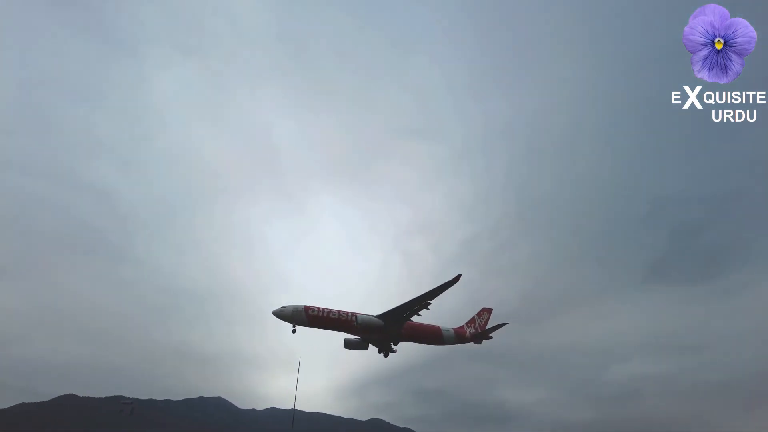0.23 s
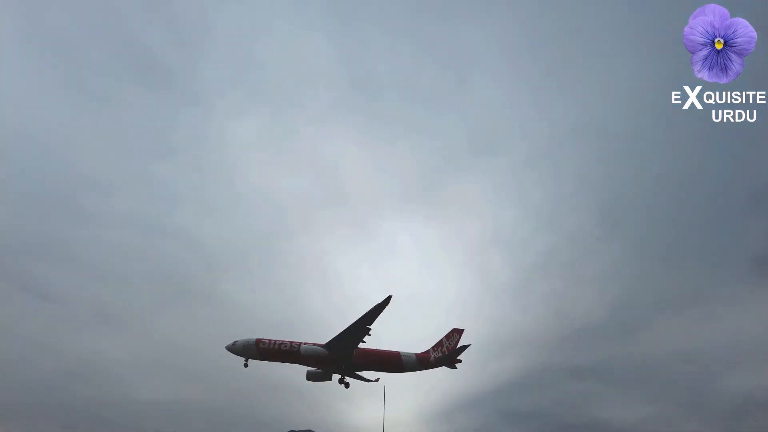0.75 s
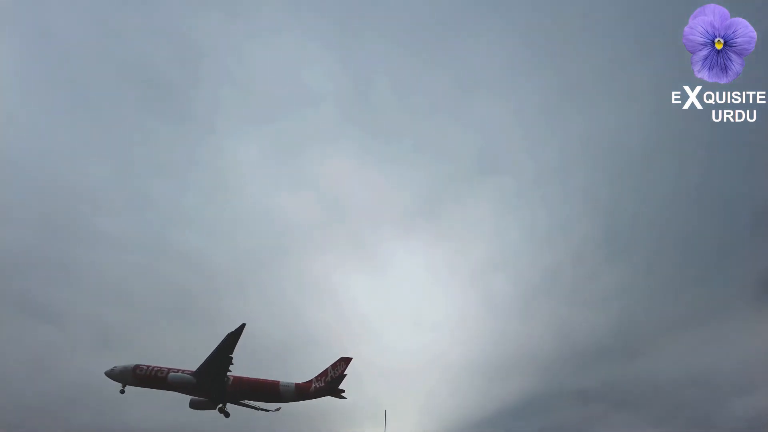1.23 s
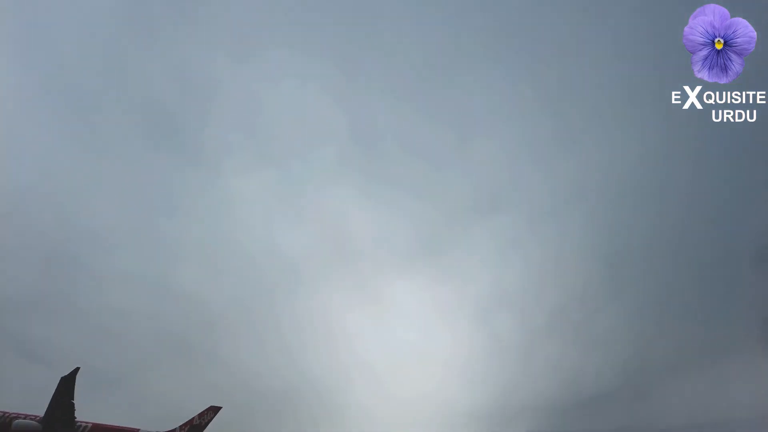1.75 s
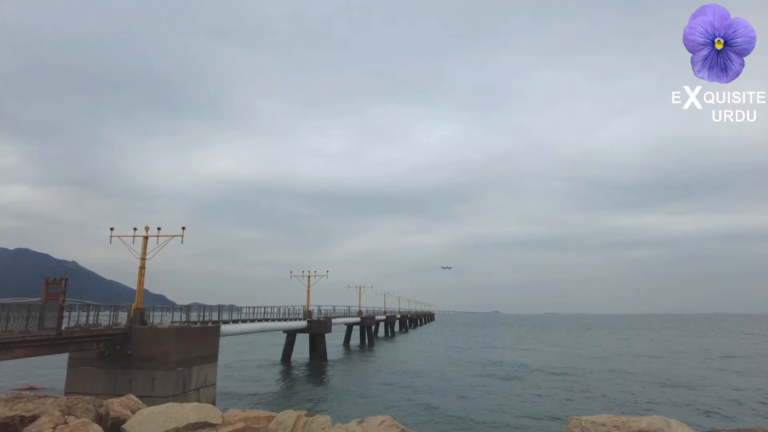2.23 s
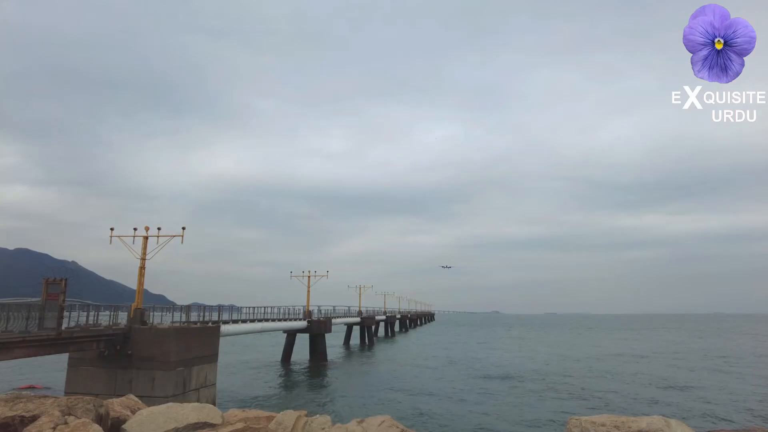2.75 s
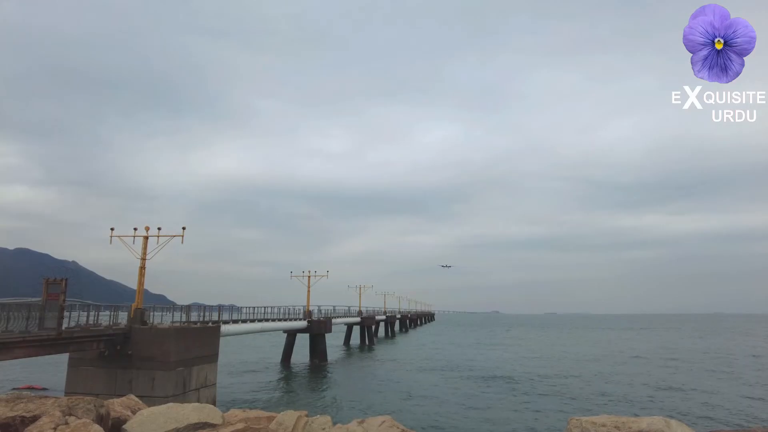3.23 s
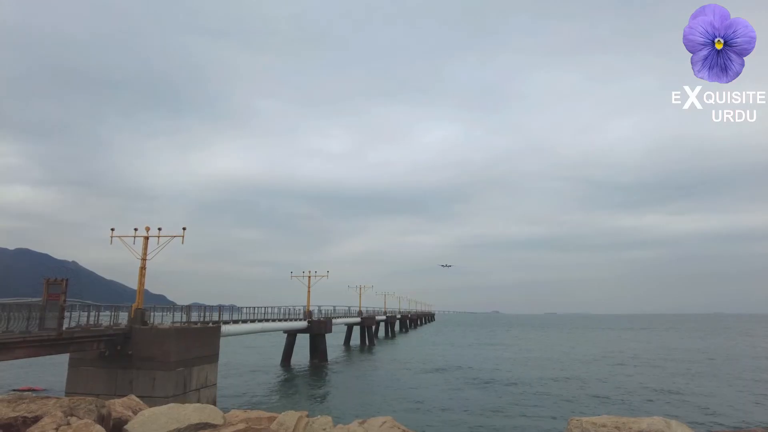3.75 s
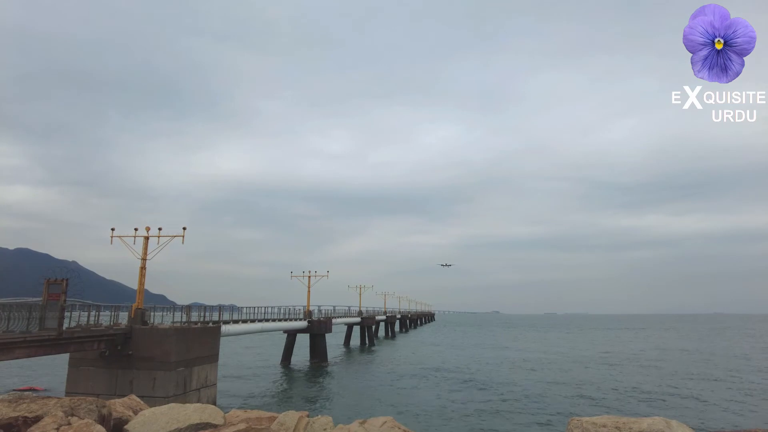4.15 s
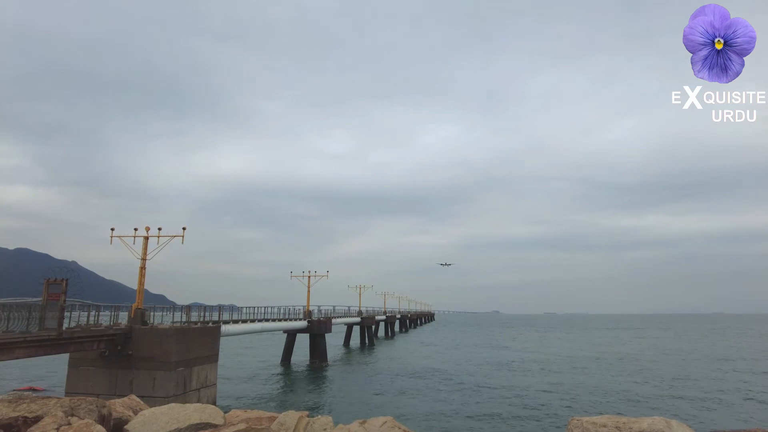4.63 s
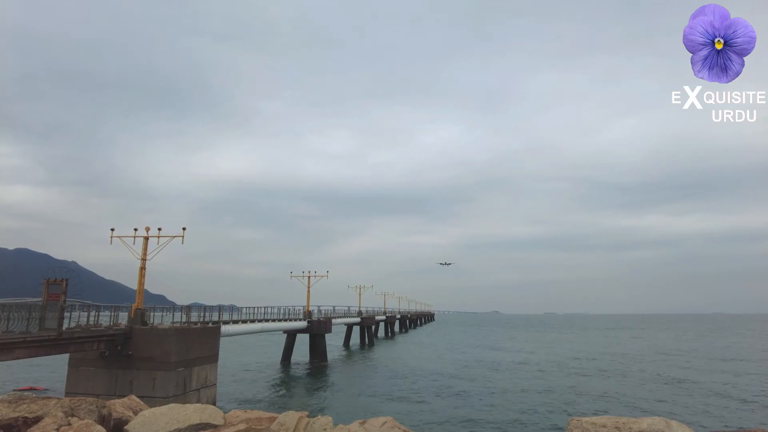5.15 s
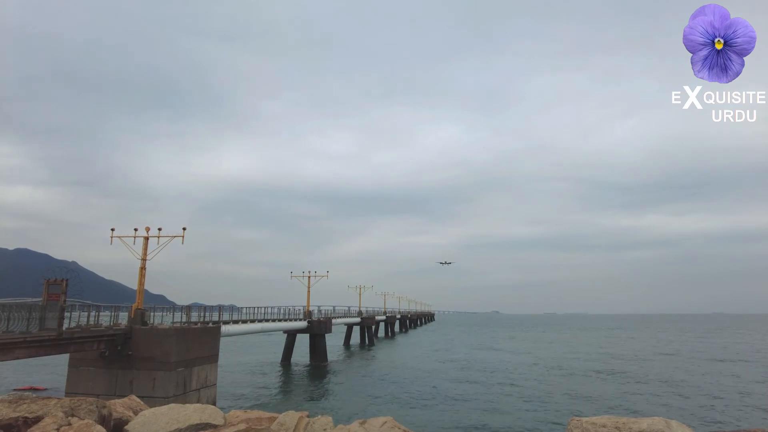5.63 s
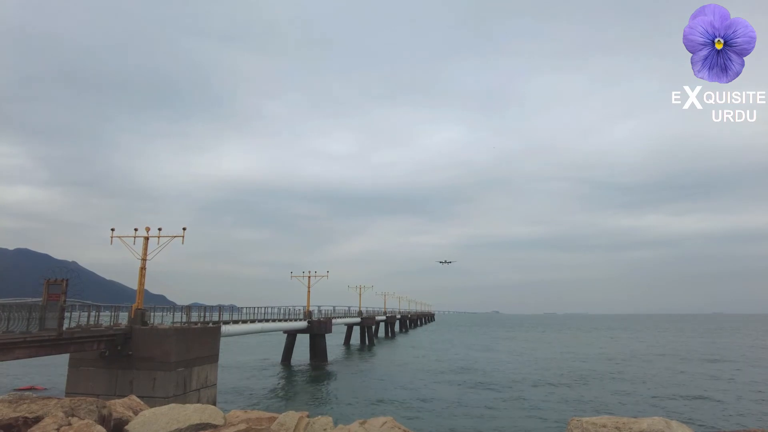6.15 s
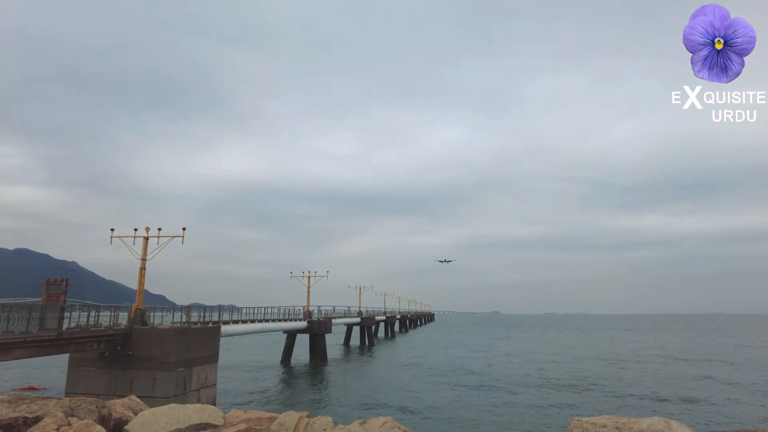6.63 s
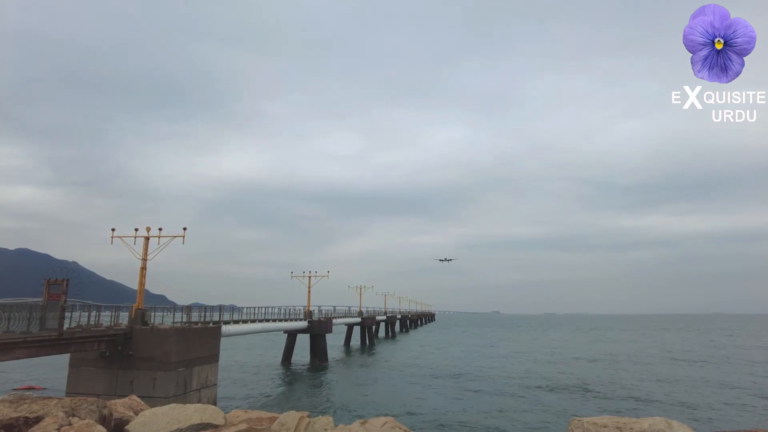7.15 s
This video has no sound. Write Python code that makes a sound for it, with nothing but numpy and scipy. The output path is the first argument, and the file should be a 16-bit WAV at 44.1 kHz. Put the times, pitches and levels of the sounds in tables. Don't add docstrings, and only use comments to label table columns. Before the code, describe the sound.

A twin-engine jet roars past low overhead, then an abrupt cut to a windy shore with distant engine rumble and faint whine.

```python
import sys
import numpy as np
from scipy import signal
from scipy.io import wavfile
from scipy.ndimage import uniform_filter1d

SR = 44100
rng = np.random.default_rng(int(sys.argv[2]) if len(sys.argv) > 2 else 0)


def rack_gain(trim_db):
    fader = np.asarray(trim_db, float)
    return 10 ** (fader / 20)


def materialize(psi):
    bounded = np.clip(np.atleast_2d(psi).T, -1, 1)
    quanta = np.round(bounded * 32767).astype(np.int16)
    wavfile.write(sys.argv[1], SR, quanta)


N = 325899
CUT = 94330


def in_time(rows):
    s, *columns = np.transpose(rows)
    return [np.interp(np.arange(N) / SR, s, c) for c in columns]


def at_hz(points, hz):
    point_hz, point_db = np.array(points).T
    return np.interp(np.log(hz), np.log(point_hz), point_db)


def rms_one(x):
    return x / np.sqrt(np.mean(x ** 2) + 1e-20)


def steep(x, hz):
    return signal.sosfilt(signal.cheby2(8, 50, hz, fs=SR, output="sos"), x)


def late(x, samples):
    return np.interp(np.arange(len(x)) - samples, np.arange(len(x)), x)


def drift(rate, size=N):
    r = np.exp(-80 * np.pi * rate / SR)
    white = rng.standard_normal(size // 40 + 2002)
    slow = signal.lfilter([1], [1, -2 * r, r * r], white)[2000:]
    return np.interp(np.arange(size) / 40, np.arange(len(slow)), rms_one(slow))


def hum(width_hz, hz):
    phase = 2 * np.pi * np.cumsum(hz) / SR
    in_phase = drift(width_hz, len(hz)) * np.cos(phase)
    return in_phase + drift(width_hz, len(hz)) * np.sin(phase)


def bands(spectrum, edges_hz, patchy_db, speed, size=N):
    together = drift(speed, size)
    white = rng.standard_normal((2, 2, size + 4000))
    for k, (low, high) in enumerate(zip(edges_hz, edges_hz[1:])):
        band = signal.butter(2, [low, high], "band", fs=SR, output="sos")
        pair = signal.sosfilt(band, white[k % 2])[:, 4000:]
        hz = np.sqrt(low * high)
        flicker_db = patchy_db * (0.26 * together + drift(speed, size))
        mid, side = pair * rack_gain(at_hz(spectrum, hz) + flicker_db)
        yield hz, mid, side


def wide(spectrum, low_hz, high_hz, count, patchy_db, speed, width_db=0):
    # (frequency [Hz], side over mid [dB])
    shore_side = [(60, -48.5), (330, -39.5), (1000, -27.5), (1900, -26.5), (3200, -7.5), (5000, -5.5),
                  (9000, 0.5)]
    total = 0
    for hz, mid, side in bands(spectrum, np.geomspace(low_hz, high_hz, count), patchy_db, speed):
        total = total + np.array([mid, rack_gain(at_hz(shore_side, hz)) * side])
    mid, side = total
    return rms_one(mid + rack_gain(width_db) * side * [[1], [-1]])


def spells(rows, rise, fall):
    t = np.arange(0, N, 64) / SR
    start, hold, db = np.array(rows)[:, :3].T[..., None]
    before = np.maximum((start - t) / rise, 0)
    after = np.maximum((t - start - hold) / fall, 0)
    return np.repeat(rack_gain(db) ** 2 * np.exp(-before ** 2 - after ** 2), 64, axis=1)[:, :N]


def gusts_db():
    # (start [s], hold [s], buffet [dB], deep thump over buffet [dB])
    gusts = [(0.095, 0.034, -27, -5.5), (0.697, 0.15, -32.5, -3), (1.145, 0.33, -35, 3),
             (1.477, 0.13, -38, 9), (1.738, 0.091, -31.5, 7.5), (2.159, .14, -26.5, -1.5),
             (2.512, 0.087, -31, 0.5), (2.701, 0.14, -27.5, -13), (2.958, 0.024, -25.5, -4.5),
             (3.196, 0.09, -26.5, -11), (3.404, 0.065, -22.5, -2), (3.547, .08, -31, -0.5),
             (3.768, .2, -29, 1), (4.098, 0.12, -25.5, -1), (4.455, .1, -26.5, -1.5), (4.628, .14, -30, -6),
             (4.876, 0.14, -37, 3), (5.203, 0.076, -36.5, -6), (5.927, 0.027, -31.5, -26),
             (6.251, .12, -31, -12), (6.541, .06, -31, -11), (6.673, 0.086, -26.5, -3),
             (6.849, 0.085, -27, -7), (7.176, 0.078, -25, -14)]
    # (time [s], buffet [dB], deep thump over buffet [dB])
    breeze = [
        (0, -30, -5),
        (2.1, -36, 8),
        (2.4, -38, 1.5),
        (5.3, -32.5, -7.5),
        (5.55, -33, -14),
        (6.1, -32, -26),
        (6.3, -33, -7.5),
        (7.39, -27.5, 0),
    ]
    power = spells(gusts, rise=0.022, fall=0.028)
    breeze_db, deep_db = in_time(breeze)
    buffet = power.sum(axis=0) + rack_gain(breeze_db) ** 2
    deep = rack_gain(np.array(gusts)[:, 3]) ** 2 @ power + rack_gain(breeze_db + deep_db) ** 2
    return 10 * np.log10(uniform_filter1d([buffet, deep], size=128))


def shore():
    # (time [s], level [dB])
    swell = [
        (2.2, -42),
        (3.0, -41),
        (3.45, -39.5),
        (3.7, -42),
        (4.35, -38),
        (4.9, -35),
        (5.5, -39.5),
        (6.0, -43.5),
        (6.65, -43.5),
        (7.39, -39),
    ]
    # (frequency [Hz], density [dB per Hz])
    far = [(220, -32), (380, 6.5), (526, 1.5), (812, -3.5), (1620, -7.5), (2180, -21.5), (2400, -39.5),
           (3150, -10), (3300, -16.5), (4290, -56), (7260, -120)]
    # (frequency [Hz], density [dB per Hz])
    spray_tone = [(3500, 7.5), (4500, -4.5), (6000, -6), (8000, -19.5), (10000, -12.5)]
    # (time [s], level [dB])
    spray_level = [
        (2.2, -70.5),
        (3.3, -74.5),
        (4.0, -72),
        (5.0, -70),
        (5.7, -69),
        (6.25, -64.5),
        (6.6, -68.5),
        (7.39, -65.5),
    ]
    roar_db, = in_time(swell)
    buffet_db = gusts_db()[0]
    gust_db = buffet_db + 30
    rumble_db = -35 + 1.01 * np.maximum(buffet_db + 30.5, 0)
    upper_db = -62 + 0.51 * (roar_db + 39) + 1.54 * (np.arange(N) - CUT) / SR + 0.16 * gust_db
    gusty_db = 1.3 * (uniform_filter1d(gust_db, size=3000) + 1.2)
    rumble_tone = [(95, 1), (200, -4.5), (400, -20.5)]
    rumble = rack_gain(rumble_db - 2) * wide(rumble_tone, 85.9, 429, count=5, patchy_db=2.0, speed=17.0)
    roar = wide(far, 455.0, 2180, count=7, patchy_db=0.93, speed=3.8, width_db=gusty_db)
    roar = rack_gain(roar_db + 2.0) * roar
    upper = rack_gain(upper_db + 1.0) * wide(far, 2220, 3580, count=4, patchy_db=2.0, speed=6.1)
    spray = wide(spray_tone, 3530, 10000, count=5, patchy_db=2.3, speed=29.0)
    return steep(rumble + roar + upper, 4010) + rack_gain(in_time(spray_level)[0]) * spray


def far_fans():
    # (start [s], hold [s], level [dB])
    whine = [(2.15, 0.045, -54), (2.38, 0.51, -52.5), (3.11, .38, -53), (3.52, .1, -54.5),
             (3.89, .22, -52.5), (4.15, 0.33, -55), (4.6, 0.57, -42), (5.38, 0.13, -51), (5.53, 0.14, -46),
             (5.96, 0.11, -53.5), (6.35, 0.078, -57), (6.52, 0.49, -52), (6.92, 0.16, -46.5),
             (7.17, .2, -61)]
    # (time [s], level [dB])
    whistle = [
        (2.15, -63),
        (2.5, -67.5),
        (4.0, -65),
        (4.38, -54),
        (5.7, -59),
        (6.25, -62.5),
        (6.5, -58),
        (7.39, -56.5),
    ]
    power = spells(whine, rise=0.01, fall=0.054).sum(axis=0)
    db = 10 * np.log10(uniform_filter1d(power, size=128) + rack_gain(-70.5) ** 2)
    level = 0.96 * rack_gain(db + 1.0 * drift(38.0))
    tone = level * np.sin(2 * np.pi * np.cumsum(2124 + 2.8 * drift(11.0)) / SR)
    neighbour = rack_gain(-64 + 0.65 * (db + 52)) * hum(8.8, np.full(N, 2260))
    flutter = rack_gain(in_time(whistle)[0]) * hum(20.5, 3408 + 8 * drift(3.0))
    return tone + neighbour + flutter


def drops():
    # (time [s], level [dB], lowest [Hz], highest [Hz], rise [s])
    ticks = [
        (2.311, -50, 4000, 4800, .003),
        (2.381, -50, 1500, 4800, .0007),
        (3.404, -42, 1000, 2900, .0008),
        (3.457, -27, 300, 1800, .0008),
        (3.492, -56, 4000, 4800, .006),
        (4.645, -61, 3900, 4900, .008),
        (6.17, -56, 2000, 6000, .0007),
        (6.5, -55, 2000, 5500, .0007),
    ]
    out, t = np.zeros(N), np.arange(-2000, 2000) / SR
    for s, db, low, high, rise in ticks:
        band = signal.butter(4, [low, high], "band", fs=SR, output="sos")
        puff = signal.sosfilt(band, rng.standard_normal(4000))
        shape = np.exp(np.where(t < 0, -(t / rise) ** 2, -t / (1.6 * rise)))
        middle = round(s * SR)
        out[middle - 2000:middle + 2000] += rack_gain(db) * shape * rms_one(puff)
    return out


def evened(x):
    power = uniform_filter1d(np.mean(x ** 2, axis=0), size=int(0.076 * SR)) + 1e-9
    share = 0.6
    return rms_one(x * power ** (-share / 2))


def wind():
    # (frequency [Hz], density [dB per Hz])
    gust_tone = [(60, 3.5), (105, -3), (200, -11), (400, -20.5), (900, -38)]
    buffet_db, thump_db = gusts_db()
    thump = wide([(14, -15), (38, 4), (60, -2)], 14, 60, count=4, patchy_db=3.0, speed=15.0)
    buffet = steep(wide(gust_tone, 59.6, 920, count=7, patchy_db=1.94, speed=14.0), 3400)
    buffet = signal.sosfilt(signal.butter(3, 48, "high", fs=SR, output="sos"), buffet)
    jolts = rack_gain(1.74 * drift(22.0))
    return jolts * (rack_gain(thump_db) * evened(thump) + rack_gain(buffet_db) * evened(buffet))


def howls():
    # (time [s], pitch [Hz], glide [Hz per s], level [dB], half length [s])
    swells = [ (.3, 945, -130, -28.5, .12), (.22, 1180, -40, -34, .06), (.98, 1068, -60, -30.5, .13),
              (1.46, 430, 40, -26, .12), (1.38, 330, 300, -27, .08), (1.7, 995, -40, -34, .09),
              (.78, 280, -80, -25, .07), (1.0, 215, 0, -27, .15), (1.33, 250, 100, -26, .08),
              (1.62, 2700, 300, -36, .16), (1.95, 3100, 500, -36, .12), (1.35, 2600, 200, -38, .07),
              (1.0, 2950, 0, -39, .07), (1.2, 5800, 600, -45, .1), (.55, 5950, 0, -49, .1),
              (.98, 7700, 0, -49, .08), (1.8, 4300, 700, -39, .2), (.15, 730, -50, -34, .1),
              (1.5, 1480, 80, -38, .1)]
    t, out = np.arange(CUT) / SR, 0
    for s, hz, glide, db, half in swells:
        pitch = hz + glide * (t - s)
        core = 1.3 * (hz < 2000) * np.sin(2 * np.pi * np.cumsum(pitch) / SR)
        swell = rack_gain(db) * np.exp(-((t - s) / half) ** 2)
        out = out + swell * (core + 0.6 * hum(6 + 0.02 * hz, pitch))
    return out


def airliner():
    # (time [s], deep roar [dB], nearness [0-1])
    flyby = [
        (0, -24, 0.14),
        (.3, -20, .25),
        (.66, -21, 0.3),
        (.8, -20, 0.35),
        (.98, -19, 0.71),
        (1.2, -21.5, 0.57),
        (1.45, -18, 0.91),
        (1.9, -22.5, 0.82),
        (2.14, -20, 0.56),
    ]
    # (time [s], fan haystack [Hz], haystack [dB], right lag [samples])
    path = [
        (0, 4480, -52, 0.5),
        (.55, 4120, -52, 0.6),
        (.85, 4540, -54, 0.4),
        (1.0, 4200, -47.5, 0.46),
        (1.3, 4550, -45, 0.6),
        (1.6, 4795, -43, 2.1),
        (1.8, 5100, -44, 1.5),
        (2.14, 5300, -57, 2.5),
    ]
    # (frequency [Hz], density [dB per Hz])
    jet = [(53, -45), (90, -28), (161, -3), (428, -6.5), (577, -6), (951, -12), (2290, -24.5), (2910, -28),
           (3630, -30), (4610, -30), (7910, -38), (10700, -53.5), (13900, -81), (22000, -120)]
    # (frequency [Hz], side over mid [dB])
    jet_side = [(60, -32), (110, -23), (190, -29), (330, -21.5), (590, -19.5), (1040, -12), (1840, -43),
                (3270, -4.5), (5780, -6.5), (10200, -16.5)]
    # (frequency [Hz], balance [dB])
    jet_balance = [(200, 0), (450, .5), (1000, 0), (1800, -1.5), (3300, -1.5), (5800, -1), (10000, 1)]
    # (time [s], extra path [ms])
    ground_echo = [
        (0, 3.8),
        (1.0, 4.2),
        (2.14, 4.32),
    ]
    deep_db, near = (c[:CUT] for c in in_time(flyby))
    stack_hz, stack_db, lag = (c[:CUT] for c in in_time(path))
    roar_db = -23.5 - 1.5 * near
    hiss_db = -41 + 8 * near
    top_db = -72.5 + 26.5 * near
    width_db = 0.9 + 7 * np.arange(CUT) / SR

    parts = np.zeros((4, 2, CUT))
    edges_hz = np.geomspace(95, 13500, 20)
    for hz, mid, side in bands(jet, edges_hz, patchy_db=1.21, speed=17.0, size=CUT):
        lean = np.tanh(at_hz(jet_balance, hz) / 13.0) * mid
        part = int(hz > 580) + int(hz > 1900) + int(hz > 8200)
        parts[part] += [mid, lean + side * rack_gain(at_hz(jet_side, hz) - 8.5 + width_db)]
    deep, roar, hiss, top = (part / np.std(part[0]) for part in parts)
    roar = rack_gain(deep_db) * deep + rack_gain(roar_db) * roar
    hiss = rack_gain(hiss_db + 2.0) * steep(hiss, 11950)
    mid, side = roar + hiss + rack_gain(top_db + 5.0) * steep(top, 15500)

    ground = in_time(ground_echo)[0][:CUT] * SR / 1000
    mid = mid + 0.068 * steep(late(mid, ground), 1350)
    housing = 3 * SR / 4590
    mid, side = ((x + 0.13 * late(x, housing)) * 0.94 for x in (mid, side))
    haystack = rack_gain(stack_db + 2.5 * drift(9.0, CUT)) * hum(130.0, stack_hz)
    mid = mid + howls() + haystack
    out = np.array([late(mid + side, 4 - lag / 2), late(mid - side, 4 + lag / 2)])
    return np.pad(out, ((0, 0), (0, N - CUT)))


def scene():
    after = np.arange(N) >= CUT
    return airliner() + wind() + after * (shore() + far_fans() + drops())


def drop_faint(x, limit, loud_db):
    hz, t, lines = signal.stft(x, SR, "cosine", 2048, 1024)
    power = np.mean(abs(lines[:1024].reshape(128, 8, -1)) ** 2, axis=1)
    frame_db = np.interp(t * SR, np.arange(N), loud_db)
    masking_db = 0.9 * (frame_db + 27.5) + 2.2 * rng.standard_normal(len(t))
    limit_db = at_hz(limit, hz[4::8])[:, None] + masking_db + 1.6 * rng.standard_normal(power.shape)
    lines[:1024] *= np.repeat(power > rack_gain(limit_db) ** 2, 8, axis=0)
    return signal.istft(lines, SR, "cosine", 2048, 1024)[1][:N]


def top_cut(x):
    return signal.sosfilt(signal.butter(12, 15900, fs=SR, output="sos"), x)


def record(dry):
    # (frequency [Hz], limit [dB per line])
    mid_drop = [(100, -130), (3000, -112), (3700, -99), (6000, -99), (9000, -102), (10500, -95),
                (12500, -100)]
    # (frequency [Hz], limit [dB per line])
    side_drop = [(100, -86.5), (500, -84.5), (1500, -89), (2900, -86.5), (3250, -106), (3600, -94.5),
                 (5000, -101), (12000, -104)]
    # (time [s], jump [full scale], lead-in [s], muted share [0-1], fade-in [s])
    splices = [
        (0, 0, .001, .3, .002),
        (2.1390, .26, .0006, 1, .03),
        (2.76401, -.115, .0015, .9, .004),
        (2.7426, .006, .001, 0, .001),
        (2.7533, .008, .001, 0, .001),
        (2.7746, -.018, .001, 0, .001),
        (2.7853, -.011, .001, 0, .001),
        (7.39, 0, .002, .6, .001),
    ]
    left, right = 0.76 * np.tanh(dry / 0.72)
    loud_db = 10 * np.log10(uniform_filter1d(left ** 2, size=1800) + 1e-9)
    mid = drop_faint((left + right) / 2, mid_drop, loud_db)
    side = drop_faint((left - right) / 2, side_drop, loud_db)
    t, out = np.arange(N) / SR, np.array([mid + side, mid - side])
    for s, jump, lead, muted, fade in splices:
        lean = np.exp(np.minimum(t - s, 0) / lead) * (t < s)
        back = 1 - muted * np.exp(-np.maximum(t - s, 0) / fade) * (t >= s)
        out = out * back * (1 - muted * lean) + jump * lean
    return top_cut(out)


dry = scene()
out = record(dry)
materialize(out)
```